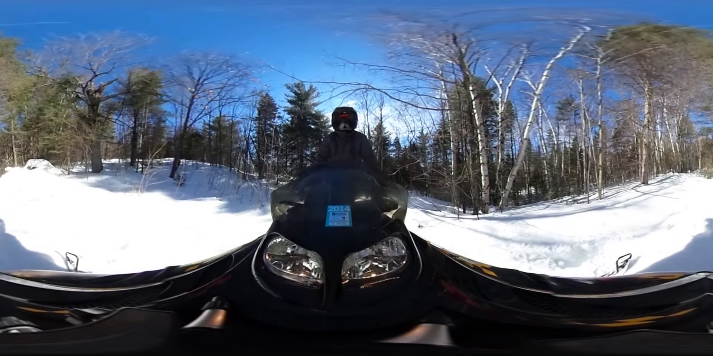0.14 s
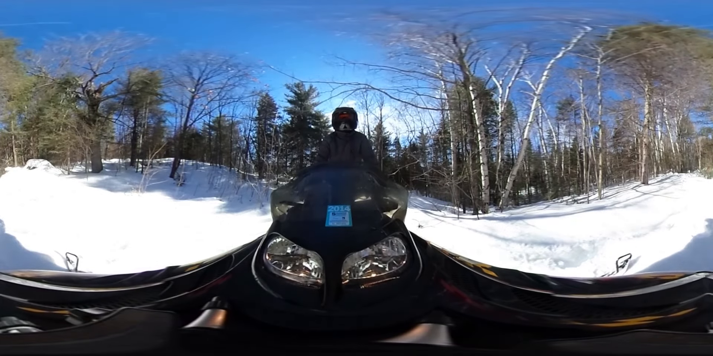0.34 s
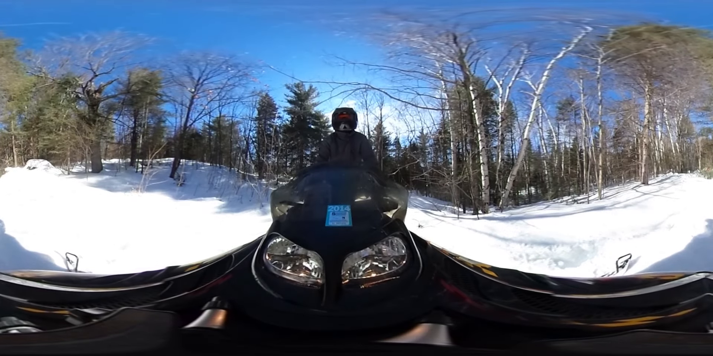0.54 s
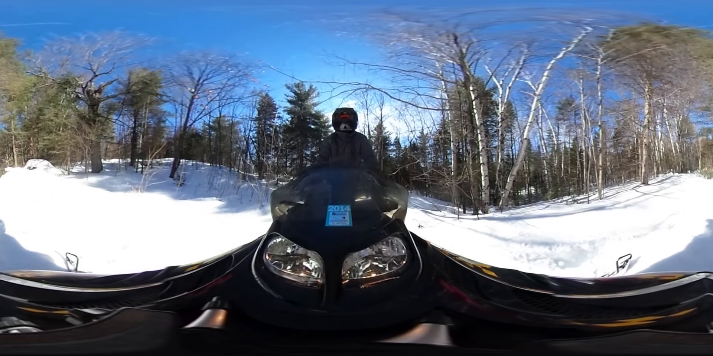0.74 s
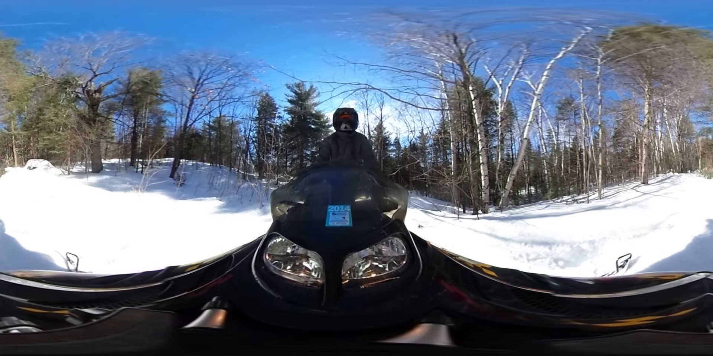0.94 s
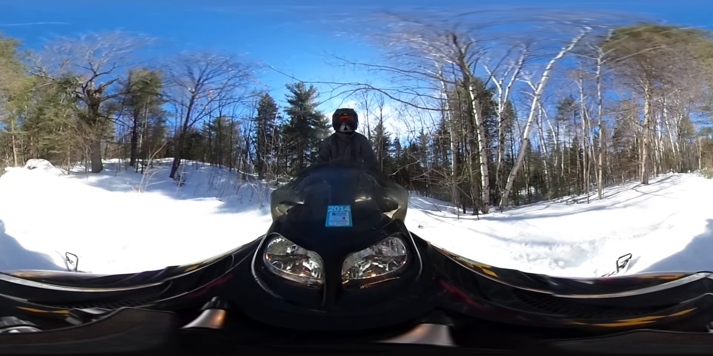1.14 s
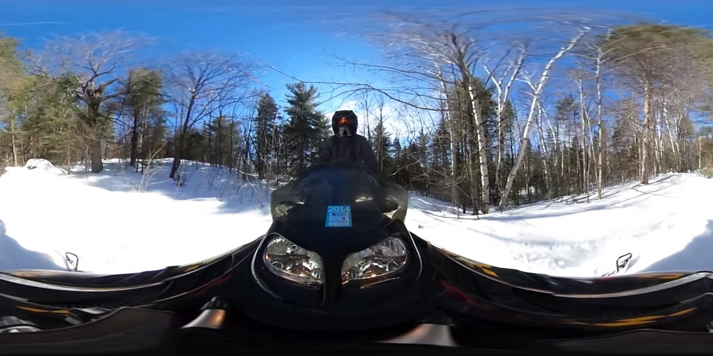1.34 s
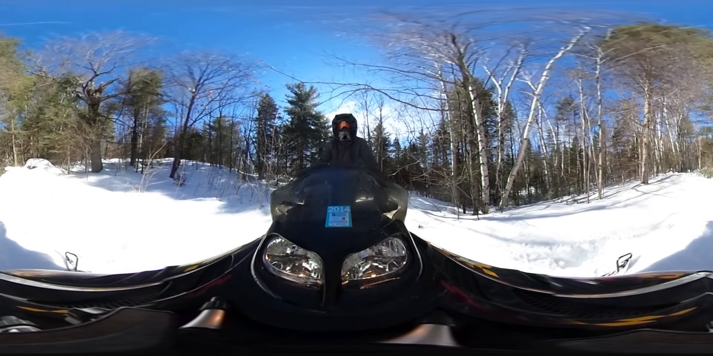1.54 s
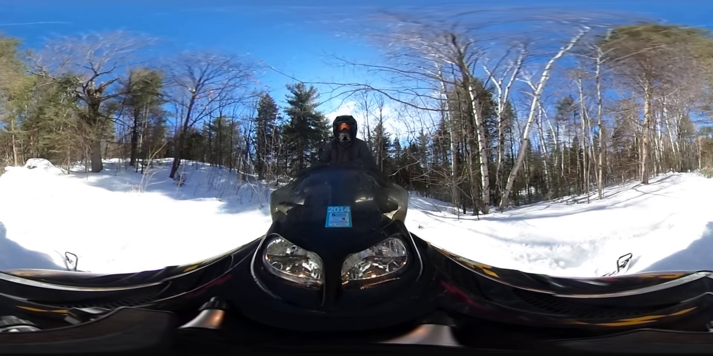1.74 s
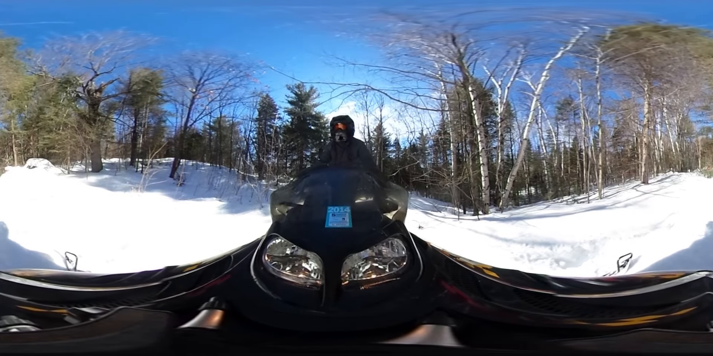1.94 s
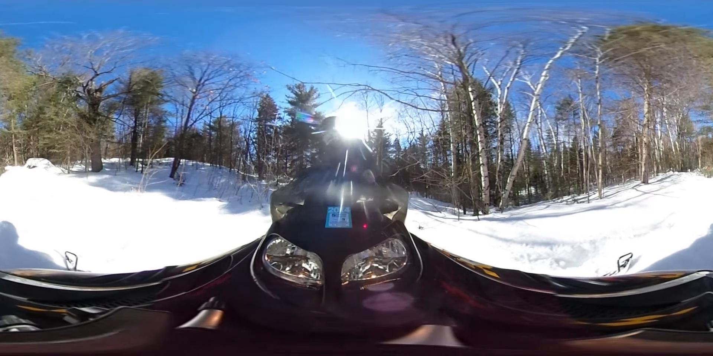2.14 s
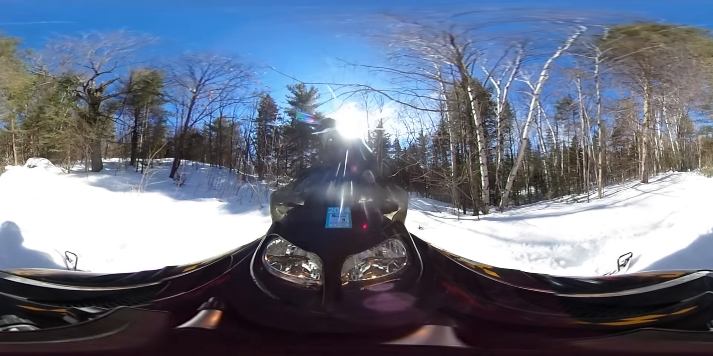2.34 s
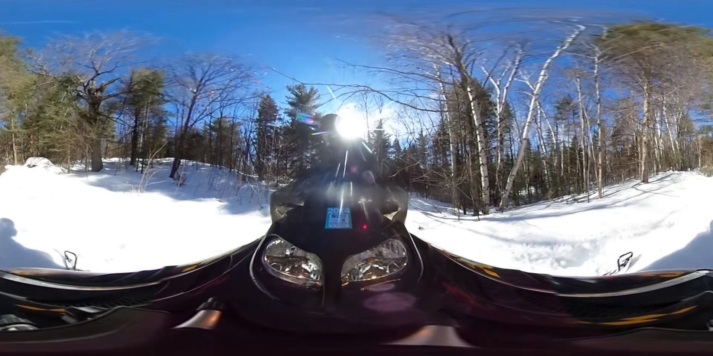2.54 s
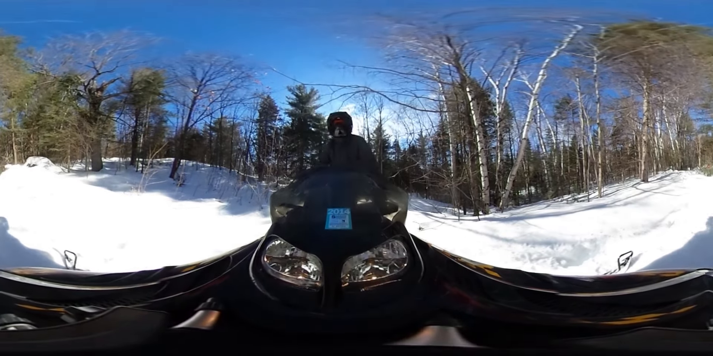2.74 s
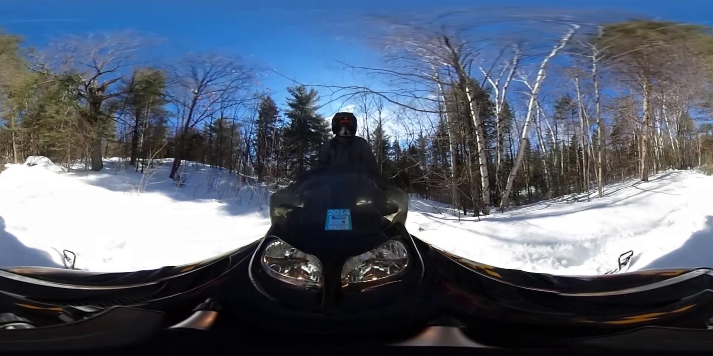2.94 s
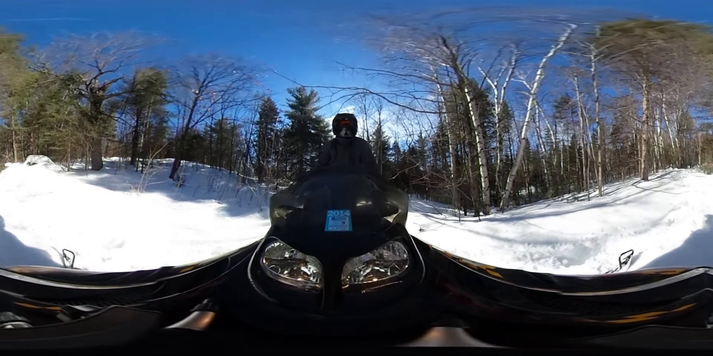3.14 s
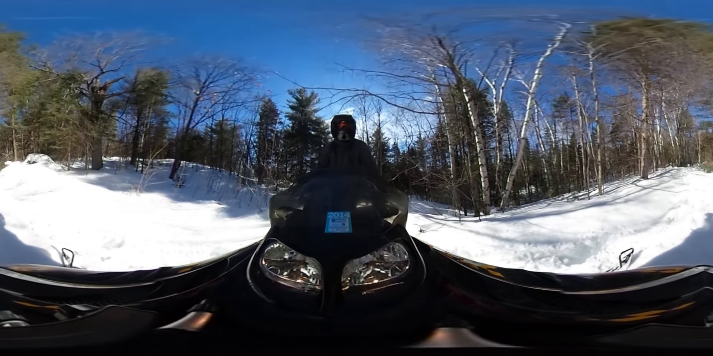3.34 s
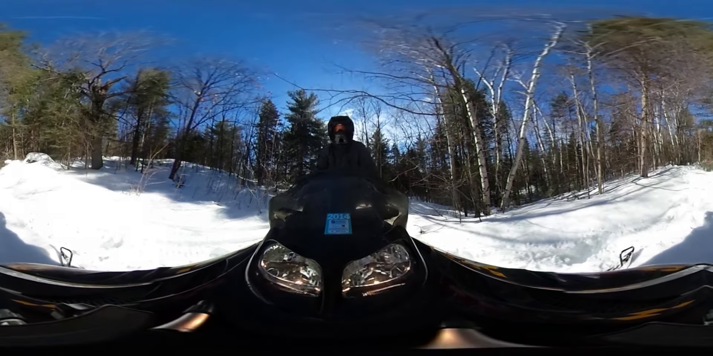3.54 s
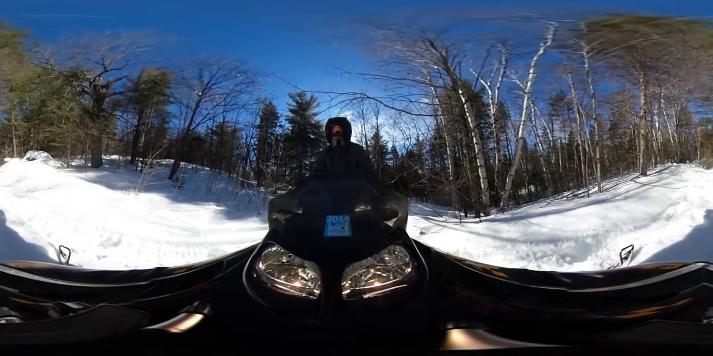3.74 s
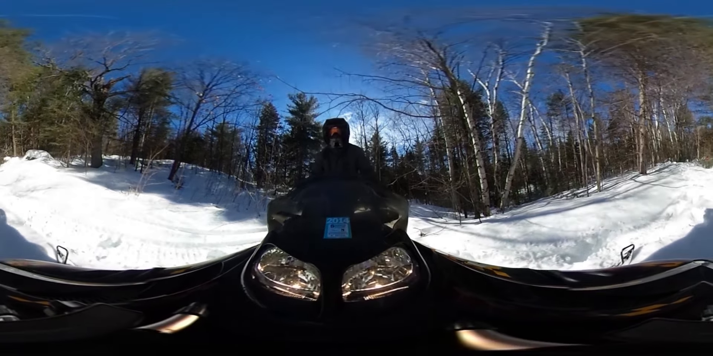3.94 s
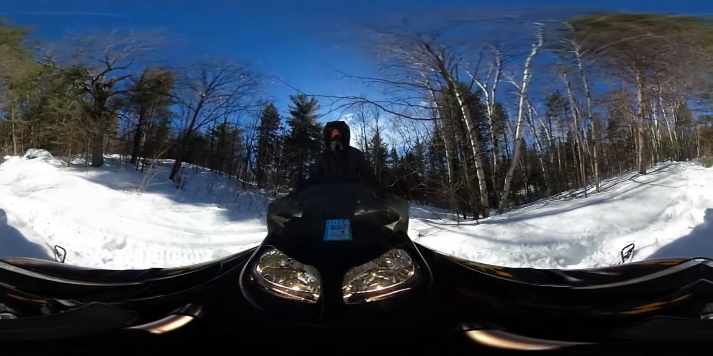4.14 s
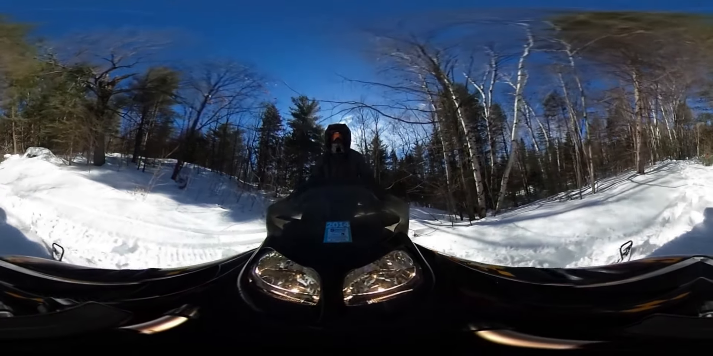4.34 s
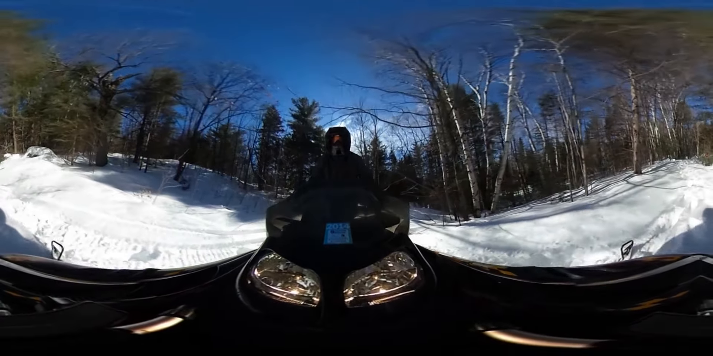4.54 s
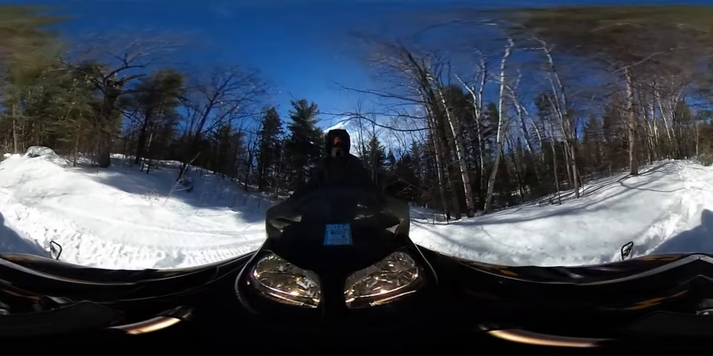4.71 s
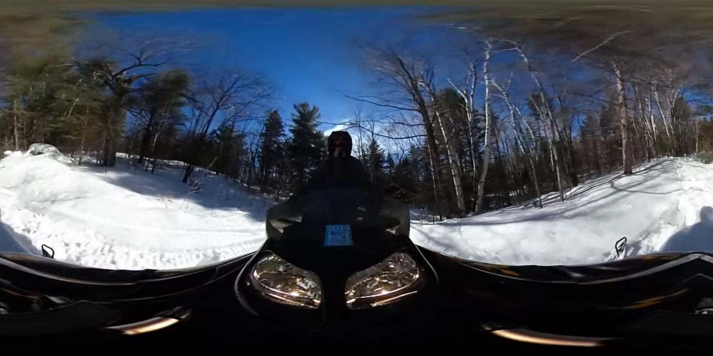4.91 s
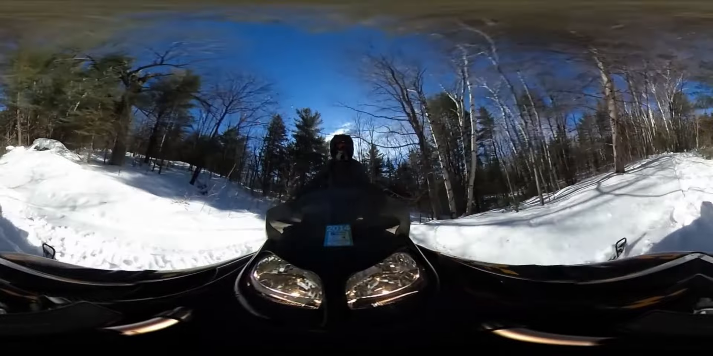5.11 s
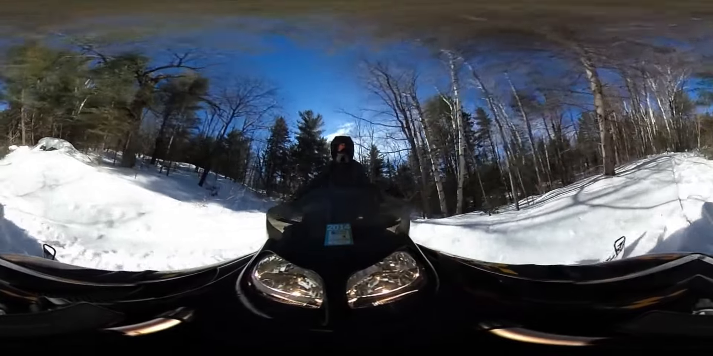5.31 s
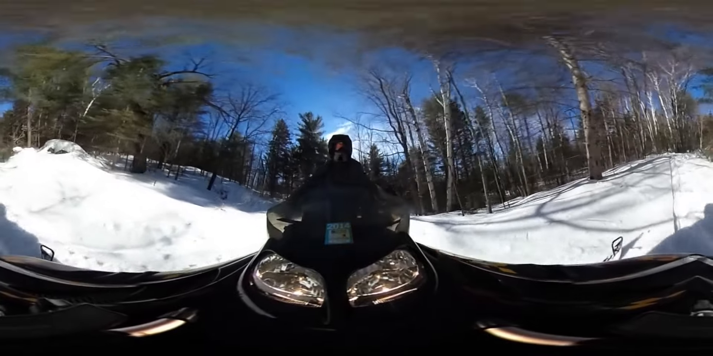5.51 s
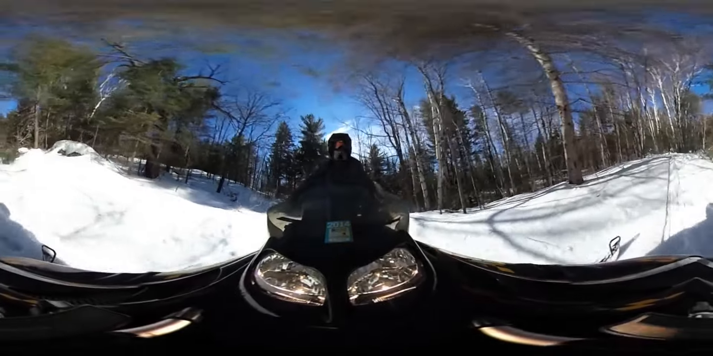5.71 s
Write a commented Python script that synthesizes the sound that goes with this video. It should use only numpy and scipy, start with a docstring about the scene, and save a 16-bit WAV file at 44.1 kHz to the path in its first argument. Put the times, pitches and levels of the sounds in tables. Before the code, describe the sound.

Heard very close on the hood outdoors, a two-stroke snowmobile idles with a low, uneven putter, loose rattling and faint metallic ticks. After about three seconds the throttle opens; pitch and loudness shoot up with a snarl, and the machine drives off at a nearly steady, buzzing boom with rushing hiss and drive whine. The loud part overloads the microphone into a harsh rasp.

```python
"""A two-stroke twin snowmobile idles with a lumpy beat, then revs up and pulls away over snow.
Firings ring the exhaust pipe and rattle the engine bay, with metallic ticking and faint steady tones.
As the speed climbs the machine buzzes and growls; gas, belt and track add a rush, and the drive whines.
The pipe booms near its resonance; heard close on the hood, the sound overloads into a harsh rasp.
At last the clutch holds a nearly steady speed and the boom slowly eases."""
import sys
import numpy as np
from scipy import signal
from scipy.fft import rfft, irfft
from scipy.io import wavfile
from scipy.ndimage import uniform_filter1d

SR = 44100
rng = np.random.default_rng(int(sys.argv[2]) if len(sys.argv) > 2 else 0)


def master(y):
    """Save y as 16-bit WAV."""
    cut = np.clip(np.atleast_2d(y).T, -1, 1)
    pcm = np.round(cut * 32767)  # scale
    wavfile.write(sys.argv[1], SR, pcm.astype(np.int16))


N = 254450
TIME = np.arange(N) / SR  # s
IDLE_HZ = 38.48  # mean firings per second at idle
CLIMB_S, CLIMB_OCTAVES_PER_S = 3.277, 2.72  # the speed climbs from here until the clutch holds it
THROTTLE_S, RESPONSE_S = 3.3, 0.1  # the rider opens the throttle; time the machine takes to follow


def undb(db):
    """Amplitude ratio of a level: 20 dB is a factor of ten."""
    return 10 ** (np.asarray(db) / 20)


def unit(x):
    """Normalization by the standard deviation, so that levels can be set in dB."""
    return x / np.std(x)


def even(x):
    """Automatic gain: hold the rms near 1 over 0.16 s, keeping the beat of the firings."""
    return x / np.sqrt(uniform_filter1d(x ** 2, size=6900) + 1e-12)


def walk(rate):
    """Low-pass random process: levels held 1 / rate seconds, then smoothed; spread 1."""
    hold = int(SR / rate)
    levels = rng.standard_normal(N // hold + 1)
    return unit(uniform_filter1d(np.repeat(levels, hold), hold)[:N])


def ease(x):
    """Inertia: smooth a control over the machine's response time."""
    return uniform_filter1d(x * 1., size=int(RESPONSE_S * SR))


def resonate(x, hz, width_hz):
    """Damped resonance: a second-order band-pass with gain 1 at its centre."""
    return signal.lfilter(*signal.iirpeak(hz, hz / width_hz, fs=SR), x)


def colour(x, points):
    """Spectral shaping: interpolate (Hz, dB) points over log frequency; fade below the first."""
    hz, db = np.transpose(points)
    f = np.maximum(np.fft.rfftfreq(N, 1 / SR), 1)
    gain = undb(np.interp(np.log(f), np.log(hz), db))
    low_fade = np.minimum(f / hz[0], 1)
    return irfft(rfft(x) * gain * low_fade, N)


def engine_speed():
    """Firing rate over time: a hunting idle, exponential climb (even in pitch), then a clutch limit."""
    # Speed the clutch allows on the trail. Each row: time in seconds, firings per second in Hz.
    cruise = [(4.0, 127.1), (4.2, 129.5), (4.42, 130.6), (4.6, 129.6), (4.9, 129.4), (5.2, 128.6),
              (5.42, 131.2), (5.77, 133.1)]
    hunt_hz, hunt_s = 1.16, 1.5  # the idle drifts up and down by this much, once in this time
    idle = IDLE_HZ + hunt_hz * np.sin(2 * np.pi * TIME / hunt_s)
    climb = IDLE_HZ * 2 ** (CLIMB_OCTAVES_PER_S * (TIME - CLIMB_S))
    limit = np.interp(TIME, *np.transpose(cruise))
    return ease(np.clip(climb, idle, limit))


def firings(phase, hz, weak=0.67, lead=0.95, late_s=0.00564, scatter_db=1.38, lumpy_hz=40, smooth_hz=44):
    """Impulsive excitation, one pulse a firing; at idle every third charge burns weakly and late."""
    at = np.flatnonzero(np.diff(np.floor(phase)) > 0)
    idling = np.interp(hz[at], [lumpy_hz, smooth_hz], [1, 0])
    size = 1 + idling * (np.resize([1, weak, lead], len(at)) - 1)
    late = (idling > .5) * np.resize([0, late_s, 0], len(at))
    scatter = undb(scatter_db * rng.standard_normal(len(at)))
    pulses = np.zeros(N)
    pulses[at + (late * SR).astype(int)] = size * scatter
    return pulses


def exhaust(pulses, order=5, silencer_hz=168):
    """Cascaded resonance: chambers in series ring at each firing; a low-pass silencer follows."""
    # Exhaust chambers. Each row: resonance in Hz, width in Hz.
    chambers = [(115, 28.6), (150, 30.7)]
    ring = pulses
    for hz, width_hz in chambers:
        ring = resonate(ring, hz, width_hz)
    silencer = signal.butter(order, silencer_hz, fs=SR, output="sos")
    return even(signal.sosfilt(silencer, ring))


def exhaust_level(hz, throttle):
    """Level in dB by forced resonance: a boom as the firing rate meets the pipe; more with throttle."""
    idle_db, throttle_db = -9, 1.52
    boom_hz, boom_width_hz, boom_db = 134.3, 17, 7
    ease_db_per_s = 1.0  # the boom eases as the machine gets under way
    in_tune = np.exp(-((hz - boom_hz) / boom_width_hz) ** 2)
    boom = boom_db - ease_db_per_s * (TIME - THROTTLE_S)
    return idle_db + throttle_db * throttle + in_tune * boom


def intake(phase, hz, thump_db=-12.0, octave_db=-14, airbox_hz=110):
    """Volume pumping on every stroke, burn or not: two harmonics, muffled by the airbox as they rise."""
    # levels are relative to the exhaust
    thump, octave = (1 / np.hypot(1, (k * hz / airbox_hz) ** 2) for k in (1, 2))
    fundamental = undb(thump_db) * thump * np.cos(2 * np.pi * phase)
    return fundamental + undb(octave_db) * octave * np.cos(4 * np.pi * phase)


def growl(pulses):
    """Higher pipe resonances: hard firings under strain ring above the silencer's range."""
    # Resonances, each passed twice. Each row: centre in Hz, width of one pass in Hz.
    modes = [(225, 112), (520, 250)]
    return even(sum(resonate(resonate(pulses, hz, width_hz), hz, width_hz) for hz, width_hz in modes))


def clatter(phase, ring_s=0.045):
    """Impulse response by convolution: each piston shakes the bay in its own way, alike every turn."""
    t = TIME[:SR // 10]
    strokes = np.diff(np.floor(phase), prepend=0)
    out = 0
    for cylinder in range(2):
        response = rng.standard_normal(len(t)) * np.exp(-t / ring_s)
        own_strokes = strokes * (np.floor(phase) % 2 == cylinder)
        out = out + signal.fftconvolve(own_strokes, response)[:N]
    return even(out)


def rush(pulses, puff_s=0.023, puff=0.1, flutter_db=0.78):
    """Modulated noise: gas and moving parts hiss, with a short decaying puff as each port opens."""
    gate = signal.lfilter([1], [1, -np.exp(-1 / (puff_s * SR))], pulses)
    return even(rng.standard_normal(N) * (1 + puff * gate) * undb(flutter_db * walk(40)))


def buzz(phase, count=100, shake=0.003, odd_db=-2.5):
    """Harmonic series of the crank: geared parts repeat each turn; uneven rotation blurs high orders."""
    crank = phase / 2 + shake * walk(60)  # turns; two firings a turn
    start = rng.uniform(0, 2 * np.pi, count)
    orders = range(3, count)
    return unit(sum(undb(odd_db * (k % 2)) * np.sin(2 * np.pi * k * crank + start[k]) for k in orders))


def engine_bay(pulses, phase, load, buzz_db, idle_knock_db=-4):
    """Radiation through the hood: clatter, buzz and rush; the colour shifts as belt and track load."""
    # Colour of the bay at idle. Each row: frequency in Hz, gain in dB.
    idle_colour = [(150, -7), (260, 0), (400, 6), (500, 0), (640, 6.5), (850, 1), (1080, 0.5), (1450, -5.5),
                   (2150, -3.5), (3200, -18), (5800, -18.5), (7600, -20), (8700, -30), (11700, -22)]
    # Colour of engine, belt and track under load. Each row: frequency in Hz, gain in dB.
    load_colour = [(30, -26), (70, 1), (230, -3), (420, 0), (800, 1), (1200, 2), (1700, -7.5), (2250, -2),
                   (2700, -12), (3400, -13), (4300, -17), (7000, -16), (9000, -17), (11700, -13)]
    hiss = rush(pulses)
    idle = unit(colour(hiss + undb(idle_knock_db) * clatter(phase), idle_colour))
    loaded_hiss = unit(colour(hiss, load_colour))
    loaded_buzz = even(colour(buzz(phase), load_colour))
    driving = even(loaded_hiss + undb(buzz_db) * loaded_buzz)
    return even((1 - load) * idle + load * driving)


def whine(phase, waver=0.37, flutter_db=3.0):
    """Order-locked tones of the drive: fixed ratios to the firing rate, shaken by the ride."""
    # Drive tones. Each row: multiple of the firing rate, relative level in dB before flutter.
    tones = [(5, -13), (8.13, -0.5), (9, -12.5), (9.15, 1.5), (16, -7), (17.3, -7.5)]
    out = 0
    for k, db in tones:
        out = out + undb(db + flutter_db * walk(9)) * np.sin(2 * np.pi * k * phase + waver * walk(30))
    return unit(out)


def ticking(phase, tick_db=-42, lead_turn=0.049, length_turn=0.19, scatter_db=2.5):
    """Gated noise: a metallic rasp just ahead of each firing, strongest on average once in three."""
    # Colour of the metallic rasp. Each row: frequency in Hz, gain in dB.
    metal = [(900, -31), (2200, 18), (3500, -28), (5600, 8.5), (7400, 8), (8800, -4), (10500, 6.5),
             (11700, 9)]
    ahead = phase + lead_turn  # lead and length are shares of a firing cycle
    size = np.resize([.6, 1, .4], N) * undb(scatter_db * rng.standard_normal(N))
    gate = size[ahead.astype(int)] * np.exp(-(ahead % 1) / length_turn)
    return undb(tick_db) * unit(gate * colour(rng.standard_normal(N), metal))


def hum(waver=1.0, flutter_db=3):
    """Speed-independent tones: faint sines about fixed pitches, wavering in phase and level."""
    # Steady tones. Each row: frequency in Hz, level in dB before flutter.
    tones = [(614, -36), (1208, -36)]
    out = 0
    for hz, db in tones:
        out = out + undb(db + flutter_db * walk(12)) * np.sin(2 * np.pi * hz * TIME + waver * walk(14))
    return out


def scene():
    """Superposition at the hood: engine speed, throttle and strain set the levels of the sources."""
    hz = engine_speed()
    octaves = np.log2(hz / IDLE_HZ)
    throttle = ease(TIME > THROTTLE_S)
    # strain is the rate of climb, 0-1; load is the share of belt and track in the colour, 0-1
    strain = np.clip(ease(np.gradient(octaves) * SR / CLIMB_OCTAVES_PER_S), 0, 1)
    load = np.clip(0.093 + 0.45 * octaves, 0, 1)
    phase = 0.68 + np.cumsum(hz) / SR  # firing cycles; part of one is already gone at the start
    pulses = firings(phase, hz)
    boom = undb(exhaust_level(hz, throttle)) * (exhaust(pulses) + intake(phase, hz))
    snarl = undb(-13.5) * strain * load * growl(pulses)
    bay_db = -24 + 9 * octaves + 2.5 * throttle  # grows with engine speed and with throttle
    buzz_db = -0.5 + 4 * strain  # buzz against rush
    bay = undb(bay_db) * engine_bay(pulses, phase, load, buzz_db)
    drive = undb(-45.5 + 20 * octaves) * whine(phase)
    return (boom + snarl + bay + drive + ticking(phase) + hum())[None]


def overload(x, ceiling):
    """Saturation: clip flat with a slightly rounded knee, which adds harmonics to loud sound."""
    return x / (1 + (x / ceiling) ** 16) ** (1 / 16)


def cut(x, hz):
    """Band limiting: a steep low-pass without phase shift."""
    return irfft(rfft(x) / (1 + (np.fft.rfftfreq(N, 1 / SR) / hz) ** 160), N)


def record(dry, first_ceiling=0.68, second_ceiling=0.66, first_cut_hz=12100, second_cut_hz=14500):
    """Two clipping passes, each before a steep low-pass: a harsh, flat-topped rasp, dulled top treble."""
    first_pass = cut(overload(dry, first_ceiling), first_cut_hz)
    return cut(overload(first_pass, second_ceiling), second_cut_hz)


dry = scene()
out = record(dry)
master(out)
```